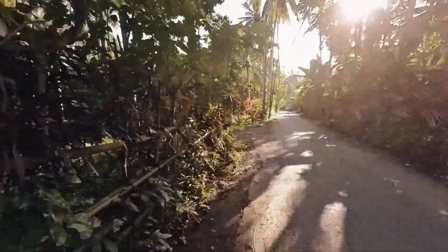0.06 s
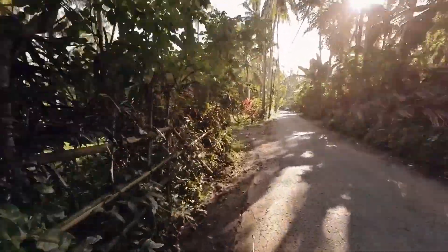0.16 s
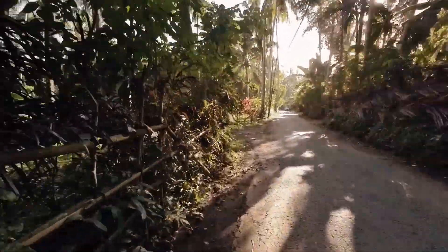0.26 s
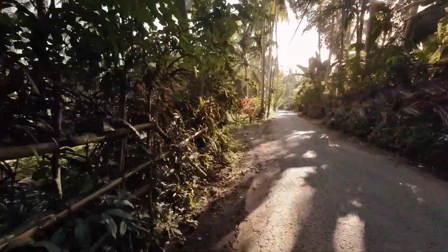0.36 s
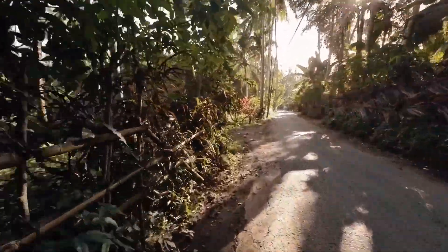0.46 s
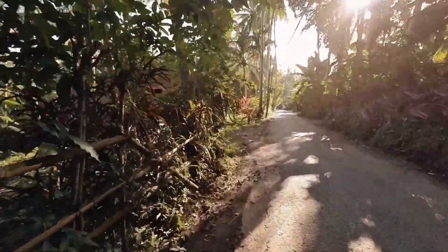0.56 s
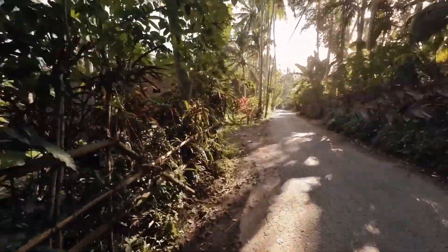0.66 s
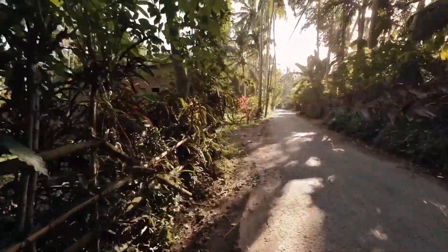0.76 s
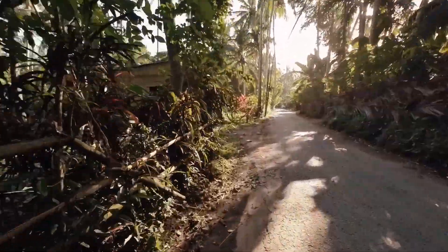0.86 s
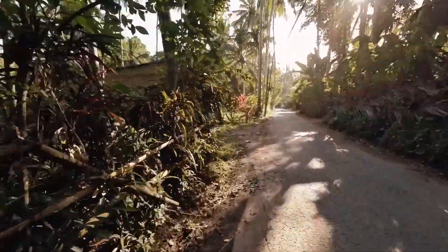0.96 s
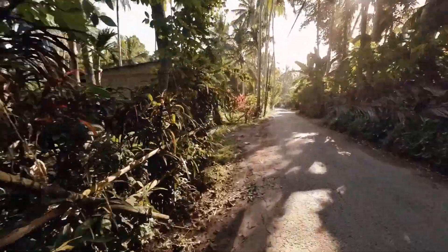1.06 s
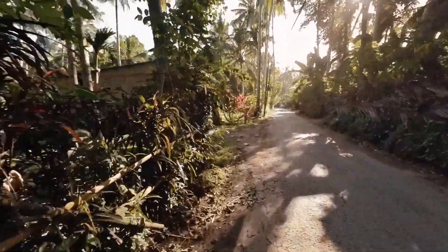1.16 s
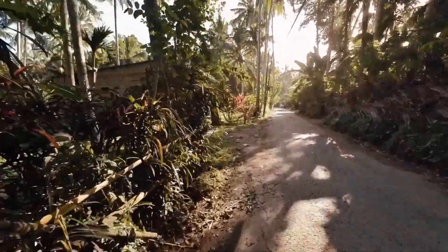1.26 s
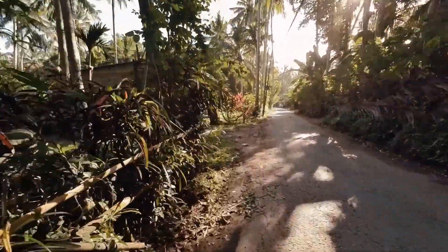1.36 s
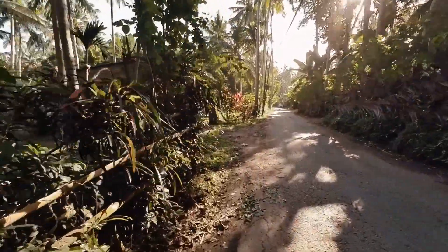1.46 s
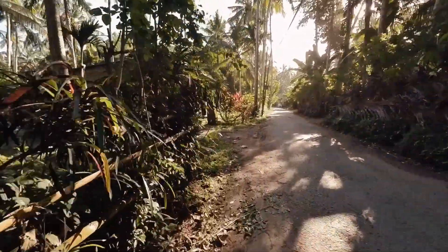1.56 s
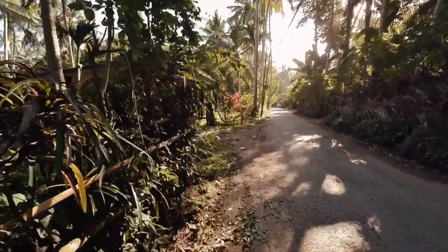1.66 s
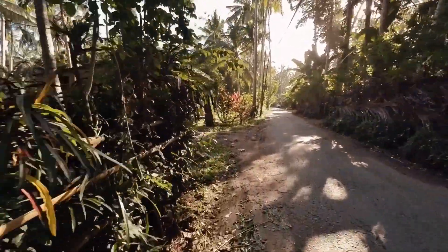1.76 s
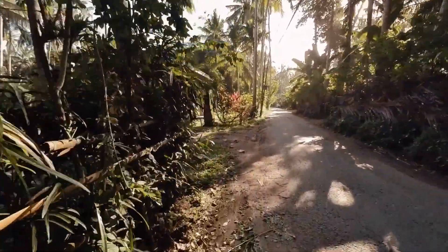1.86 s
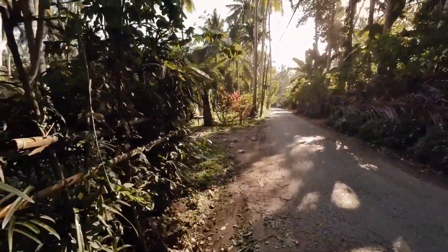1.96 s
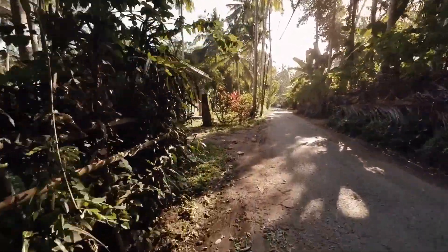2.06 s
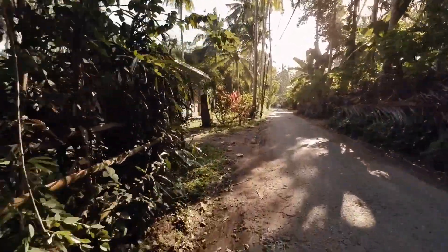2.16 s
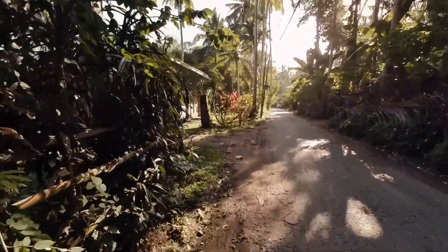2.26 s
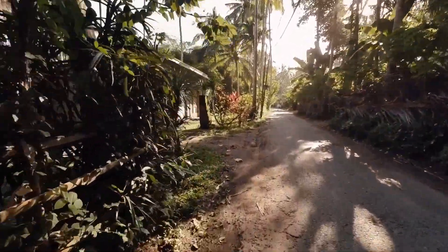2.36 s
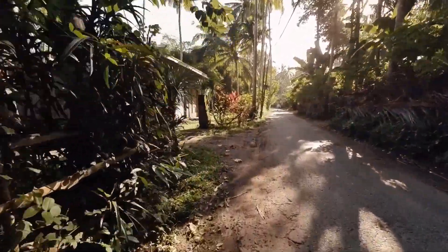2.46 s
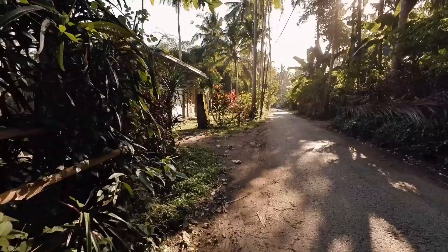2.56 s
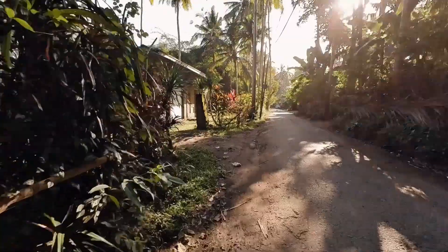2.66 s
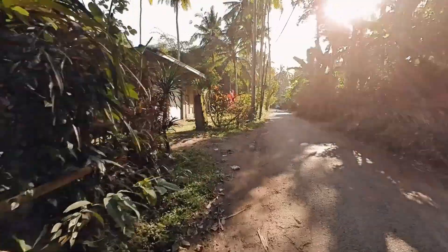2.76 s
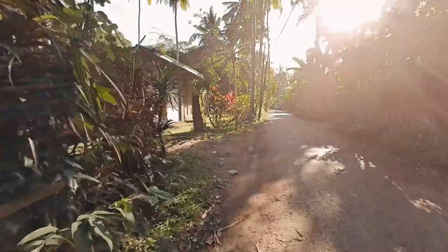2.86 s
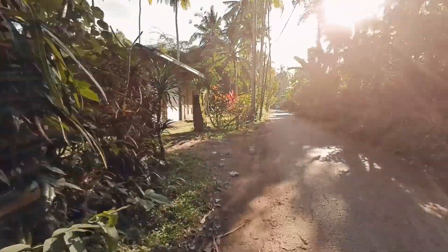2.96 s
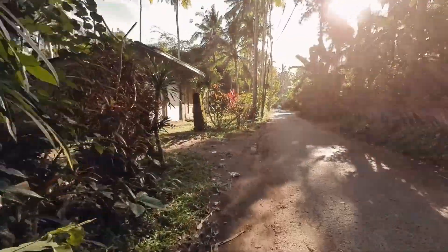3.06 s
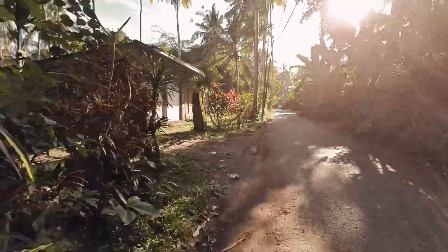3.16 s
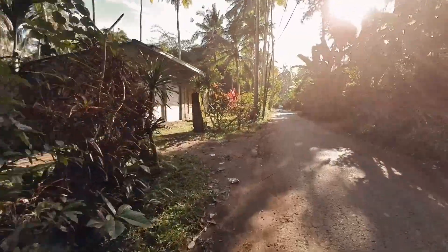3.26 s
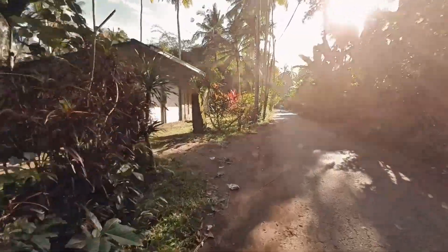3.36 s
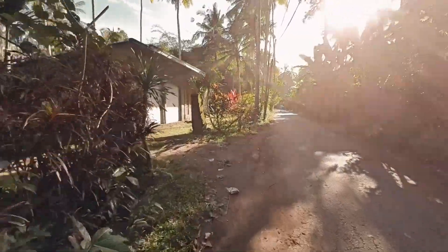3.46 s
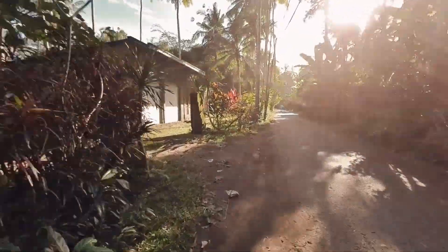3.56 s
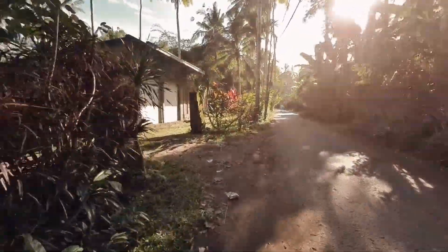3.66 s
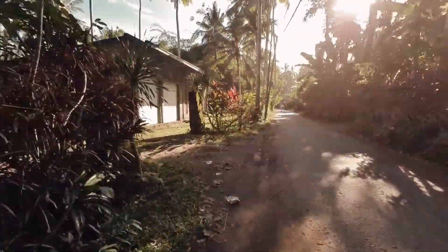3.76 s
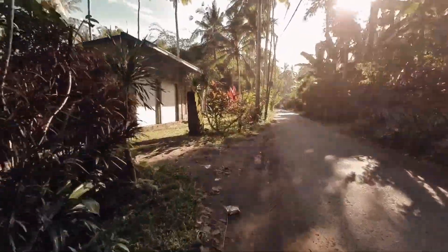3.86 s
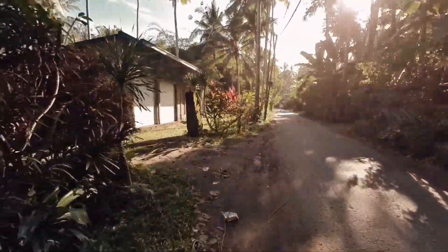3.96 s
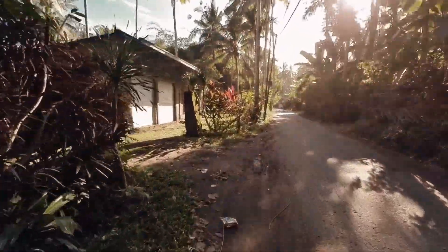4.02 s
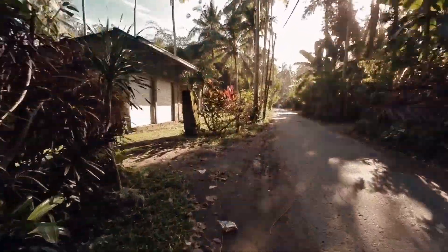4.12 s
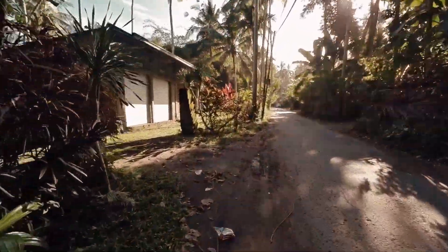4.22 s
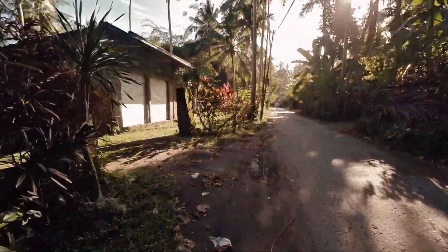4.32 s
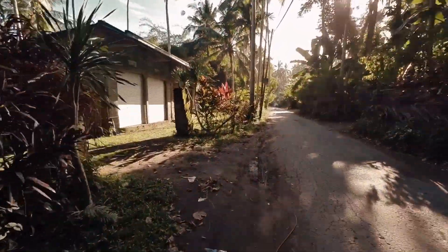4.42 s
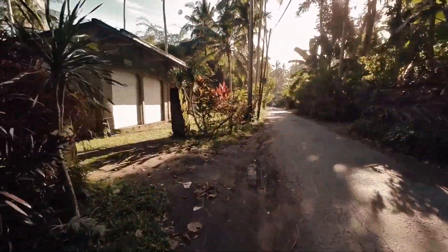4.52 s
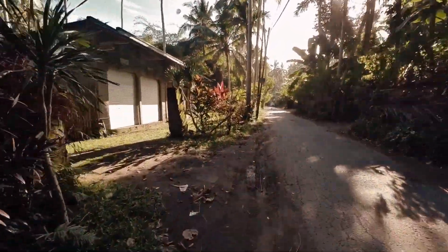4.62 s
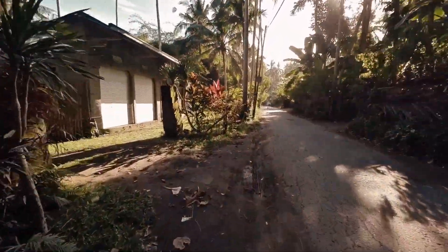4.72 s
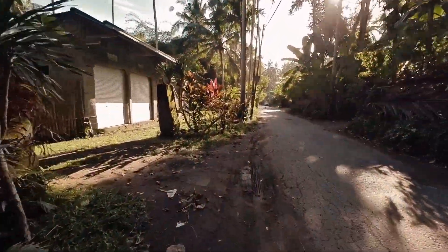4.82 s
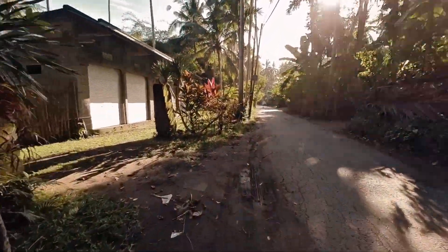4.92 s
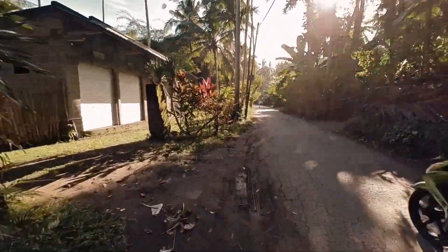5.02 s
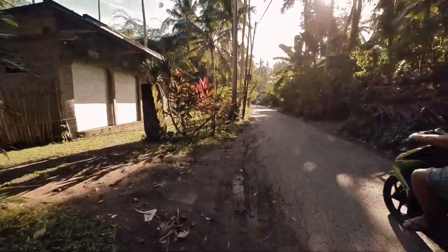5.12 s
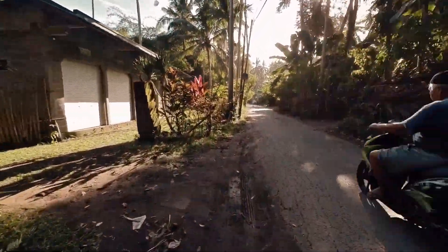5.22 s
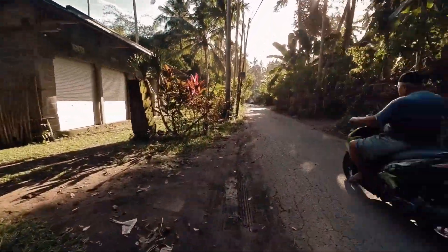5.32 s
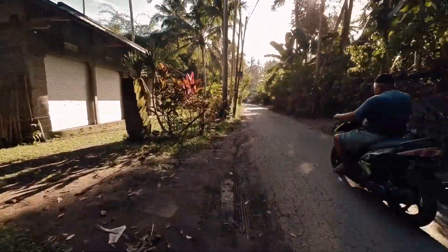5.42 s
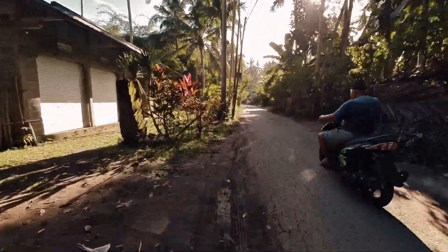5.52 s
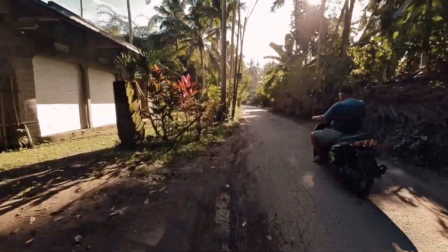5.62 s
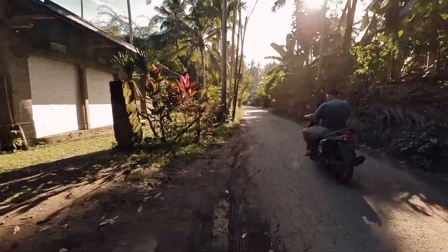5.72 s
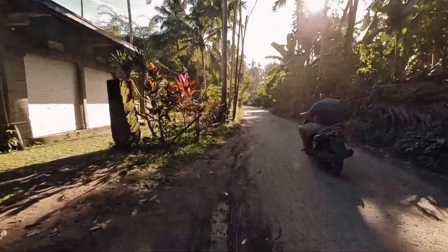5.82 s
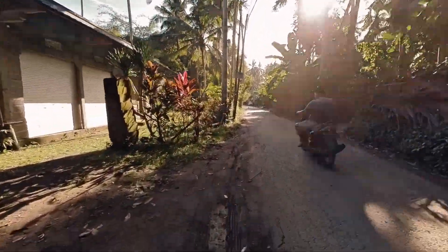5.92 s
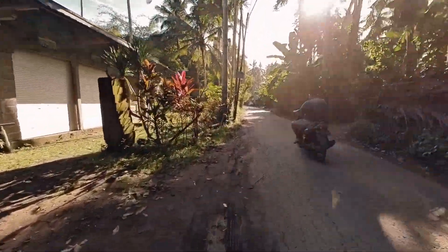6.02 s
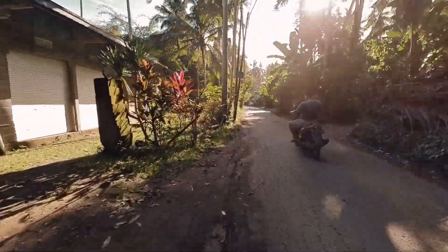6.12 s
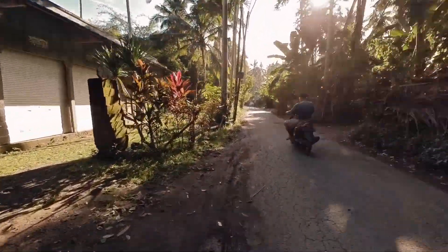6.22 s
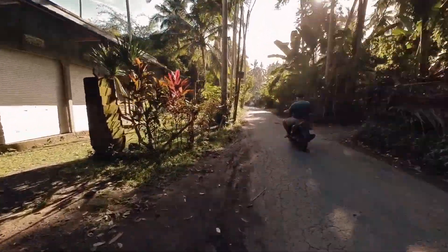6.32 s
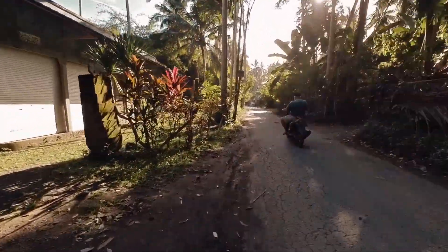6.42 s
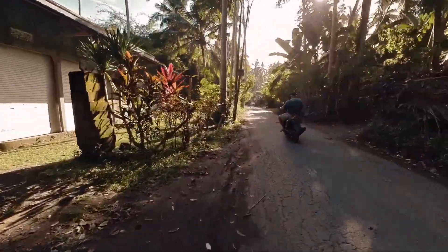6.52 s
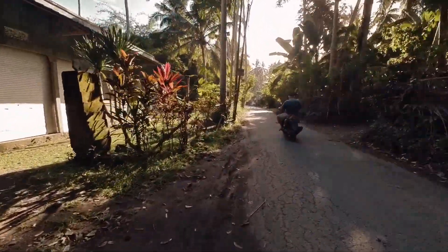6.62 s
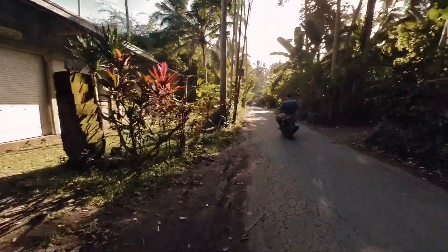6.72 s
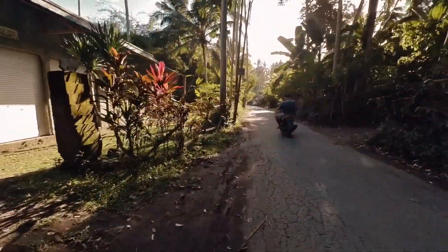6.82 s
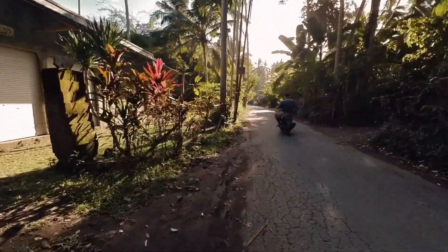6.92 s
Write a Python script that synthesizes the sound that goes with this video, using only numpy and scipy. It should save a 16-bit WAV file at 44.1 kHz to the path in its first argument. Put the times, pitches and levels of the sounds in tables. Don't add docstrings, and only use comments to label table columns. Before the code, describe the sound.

On an open-air lane, a walker carries the microphone, a faint low breeze beneath. From 0 to 3 seconds, soft heel thuds arrive about every 0.55 seconds, with small dry scuffs and ticks of grit between them, while a small single-cylinder motorbike putters faintly behind at a nearly steady low rate of about 32 pulses a second. From 3 to 4.5 seconds it swells, gaining rough casing and tyre noise and brief panel buzzes. Around 4.6 to 5 seconds it rises steeply; at about 5.2 the exhaust opens into a loud, close bark with tyre roar, valve clatter and airy hiss, and stones pop between 5 and 6 seconds. Then it recedes, with rattling tail noise and fleeting buzzes, still clearly puttering when the sound stops at 7 seconds. The body of the sound is centred, only its treble loosely wide.

```python
import sys
import numpy as np
from scipy import signal
from scipy.fft import rfft, irfft, next_fast_len
from scipy.io import wavfile
from scipy.ndimage import uniform_filter1d, map_coordinates

SR = 44100
rng = np.random.default_rng(int(sys.argv[2]) if len(sys.argv) > 2 else 0)


def store_wav(level_fs):
    pcm = np.round(np.clip(np.atleast_2d(level_fs), -1, 1) * 32767)
    wavfile.write(sys.argv[1], SR, pcm.T.astype(np.int16))


def attenuation_scalar(level_db):
    decades = np.asarray(level_db, float) / 20
    return 10 ** decades


N = 307818
TIME_S = np.arange(N) / SR

# start_s, firing_hz, throb_db at the camera, throttle_rasp_db
ENGINE = [(0, 31.25, -47, 0), (.55, 31.42, -46, -1), (.92, 31.3, -43, -1), (1.3, 31.33, -43, 1),
          (1.6, 31.5, -44.5, 1.5), (1.95, 31.85, -42.5, 1), (2.4, 32.05, -41.5, 2), (2.85, 31.96, -42.5, 3),
          (3.05, 32.07, -38, 2), (3.65, 32.17, -36.5, 3), (4.1, 32, -33.5, 1), (4.5, 31.91, -32, -1),
          (5.13, 32.14, -28.5, -2), (5.21, 32.18, -20.5, -2.5), (5.58, 31.98, -21.5, -0.5),
          (6.1, 31.78, -26, 0.5), (6.65, 31.69, -30, 0.5), (6.98, 31.7, -32, 0.5)]
# start_s, level_db
NEARNESS = [(0, -48.5), (.8, -49), (1.601, -47), (2.4, -45.5), (3.1, -42.5), (3.55, -42), (4.1, -39.5),
            (4.6, -32), (4.97, -23), (5.27, -22.5), (5.6, -26), (5.95, -29), (6.3, -32.5), (6.98, -36)]
# start_s, share (0-1)
BEHIND = [
    (0, 0.15),
    (5.25, 0),
    (5.8, 1),
    (6.98, 1),
]

# multiple of the firing rate, level_db
PIPE = [(1, -11.5), (2, -8), (3, 1.5), (4, 1.5), (5, -3.5), (6, -17), (7, -16.5), (8, -10.5), (9, -25.5),
        (10, -16), (11, -21), (12, -17)]
# re_throb_db, share of mouth gain, from_behind_db, wander_db, share of rasp
PIPE_GROUPS = [
    (-2.5, 0.16, .5, 1.2, -0.28),
    (-3, -0.78, -1, 0.8, 0.42),
    (-16.5, -0.21, 0, 3, 1),
    (-12.5, -1.76, -0.5, 2.5, 1.5),
]
# closest_db, growth with nearness, from_behind_db, side_on_db, passes_later_s
PARTS = dict(drone=(-34.5, 0.4763, 3, -1, 0), casing=(-26, 1, 2, 0, 0), cover=(-28, 1, -2, 0.5, -0.05),
         tyre=(-31, 1, -0.5, 1, -0.06), clatter=(-41, 1, 5.5, 1.5, 0.04), hiss=(-58.5, 0.85, 0.5, 6, .1),
         whistle=(-56.5, 0.9, -7.5, 4, 0.43))

# pitch_hz, density_db (per Hz)
DRONE = [(5, -2), (25, 0), (60, -3.5), (150, 0.5), (300, 2), (450, -0.5), (620, -4.5), (800, -12.5)]
# pitch_hz, width_hz, level_db
FRAME = [(388, 135, -2), (576, 73, -2.5)]
# pitch_hz, width_hz, level_db
CASING_FRONT = [(782, 148, 6), (1110, 190, 2.5)]
# pitch_hz, width_hz, level_db
CASING_TAIL = [(849, 79, 3), (1130, 83, 1)]
# pitch_hz, width_hz, level_db
COVER = [(1286, 170, 3.5), (1728, 460, -3.5)]
# pitch_hz, density_db (per Hz)
TYRE_FRONT = [(1400, -26), (1800, 0), (2200, 2), (2700, -2), (3100, -5), (3600, -10.5), (4300, -14),
              (5000, -37)]
# pitch_hz, density_db (per Hz)
TYRE_TAIL = [(1400, -29), (1900, 5.5), (2350, -0.5), (2800, 2.5), (3050, 3), (3500, 0.5), (4200, -4.5),
             (5000, -3)]
# pitch_hz, width_hz, level_db
VALVES_FRONT = [(4790, 410, 3), (6120, 760, -2), (7530, 730, -14.5)]
# pitch_hz, width_hz, level_db
VALVES_TAIL = [(4915, 270, 5), (6010, 987, -6), (7600, 770, -17.5)]
# pitch_hz, density_db (per Hz)
HISS = [(6500, -12), (8000, 8), (9200, -3), (11000, -1.5), (12000, -9), (13000, -30)]
# pitch_hz, density_db (per Hz)
WHISTLE = [(11000, -23), (12200, -7), (13300, 0), (14300, -7), (15000, -8), (15700, -20)]
# centre_s, half_length_s, pitch_hz, level_db
GLINTS = [(3.32, 0.29, 2170, -54), (3.552, 0.043, 1350, -42), (3.6, .2, 2900, -58), (4.55, 0.24, 3170, -57),
          (5.85, 0.09, 1920, -47), (0.74, 0.64, 860, -49.5), (5.15, 0.13, 450, -36.5),
          (6.24, 0.058, 3350, -44.5), (6.33, 0.2, 2970, -45.5), (6.5, .1, 7900, -68),
          (6.83, 0.17, 8300, -67), (6.8, .45, 10200, -75), (6.1, 0.12, 1470, -37.5)]

# start_s, peak_db, pitch_hz
STONES = [(1.742, -32, 731), (2.421, -34, 747), (2.798, -40, 641), (4.994, -9, 1125), (5.039, -11, 756),
          (5.117, -16, 845), (5.386, -13.5, 900), (5.197, -12.5, 940), (5.575, -9, 1096), (5.794, -17, 937),
          (5.983, -21, 1110), (6.219, -17.5, 840), (6.835, -21, 882.5)]
# start_s, thud_db, knock_re_thud_db
STEPS = [(0.184, -39, 6), (0.768, -39, 5), (1.329, -51, 9), (1.886, -35.5, 3), (2.429, -37, -8.5),
         (2.995, -38, -7), (3.578, -57, -4), (4.148, -48, 4), (4.699, -43, -7), (5.3, -66, -7),
         (5.849, -41, -9), (6.386, -29, -15), (6.929, -39, -13)]
# start_s, peak_db, low_part_re_peak_db, length_s
SCUFFS = [(0.0044, -53.5, 7, 0.039), (0.303, -57.5, 15, 0.028), (0.491, -48, 8.5, 0.047),
          (0.557, -54, 6, 0.058), (0.66, -67, 2, 0.04), (1.046, -54, 2, 0.068), (1.134, -62, -4, 0.045),
          (1.6157, -54.5, 1, 0.044), (1.731, -59, 0, 0.04), (2.172, -50.5, -8, 0.043), (2.7, -49, 7, 0.049),
          (2.741, -48, 6.5, 0.059), (3.272, -52, 5, 0.051), (3.844, -47.5, 8.5, 0.043),
          (4.617, -54, 4, 0.037)]
# start_s, peak_db, low_part_re_peak_db, length_s
TICKS = [(0.028, -62, 3, 0.0045), (0.0914, -55, 8, 0.0054), (0.1411, -59, 6, 0.005),
         (0.319, -62, 13, 0.0035), (0.495, -64, 0, 0.005), (0.586, -59, 11, 0.005),
         (1.047, -58, -2, 0.0052), (1.725, -46.5, -5, 0.005), (2.56, -66, 17, 0.0048),
         (2.693, -59, 7.5, 0.005), (2.7257, -45, -4, 0.0052), (2.77, -51, 0, 0.004),
         (3.8514, -47, 1, 0.005), (3.909, -52, 5, 0.0057), (4.167, -58, 12, 0.0046),
         (4.5113, -56, 18, 0.0046)]
# pitch_hz, density_db (per Hz)
AIR = [(5, 15), (20, 3), (60, -5), (150, 5), (300, -55)]

# pitch_hz, side_re_mid_db
WIDTH = [(2950, -90), (3150, -3.5), (4700, -6), (5800, 2), (8300, -17), (9200, 10), (11200, 0.5),
         (14500, -12)]
# pitch_hz, threshold (sigmas)
STEADINESS = [(2900, -1), (4500, 6), (5300, -1.5), (6700, -1.5), (8000, -.5), (10000, -1), (12300, 1.5),
              (14000, -4)]

# pitch_hz, density_db (per Hz)
CRACK = [(400, -30), (700, 12.0), (1500, 14.0), (3000, -12.0), (4500, -34)]
GRIT_DULL = [(1700, -30), (2300, -2), (3100, 2), (4800, -3), (7500, -10), (9000, -30)]
GRIT_BRIGHT = [(7000, 1), (8500, -5.5), (11000, -8.5), (13300, -3), (15500, -9), (16500, -30)]

CLOSEST_DB, ABREAST_S, ABREAST_WIDE_S = -23.5, 5.31, 0.28
MOUTH_S, MOUTH_OPEN_S, MOUTH_FADE_S, MOUTH_DB = 5.16, 0.012, 0.48, 6.5
SHADE_S, SHADE_WIDE_S, SHADE_DB = 5.98, 0.27, 11


def unit(x):
    return x / np.sqrt(np.mean(x ** 2) + 1e-20)


def along(points, hz):
    f, v = np.transpose(points)
    return np.interp(np.log(hz + 1), np.log(f + 1), v, left=-120, right=-120)


def curves(rows):
    s, *cols = np.transpose(rows)
    return [np.interp(TIME_S, s, c) for c in cols]


def wobble(rate):
    knots = rng.standard_normal(int(N * rate / SR) + 4)
    return map_coordinates(knots, [np.arange(N) * rate / SR])


def bump(at_s, wide_s):
    return np.exp(-((TIME_S - at_s) / wide_s) ** 2)


def filtered(x, response):
    m = next_fast_len(N + SR // 2)
    return irfft(rfft(x, m) * response(np.fft.rfftfreq(m, 1 / SR)), m)[..., :N]


def shape(points):
    return lambda f: attenuation_scalar(along(points, f))


def modes(rows):
    def response(f):
        total = 0
        for k, (centre, width, db) in enumerate(rows):
            resonator = 1j * f * width / (centre * centre - f * f + 1j * f * width)
            total = total + (-1) ** k * attenuation_scalar(db) * resonator
        return total
    return response


def rush(gate, response, patchy_db):
    z = signal.stft(rng.standard_normal(N), nperseg=512)[2]
    field = uniform_filter1d(rng.standard_normal(z.shape), 3, 0)
    field = uniform_filter1d(field, 14, 1)
    noise = signal.istft(z * attenuation_scalar(patchy_db * unit(field)), nperseg=512)[1][:N]
    return unit(filtered(gate * noise, response))


def beat(crank, count, depth_db, at, scatter_db):
    cycle = (crank * count - at + 2.5).astype(int)
    strength = 2 * np.tanh(rng.standard_normal(int(crank[-1] * count) + 9) / 2)[cycle]
    swell = np.cos(np.pi * (crank * count - at)) ** 4
    clarity = np.clip((curves(NEARNESS)[0] + 58) / 26, 0.25, 1.15)
    return attenuation_scalar(clarity * swell * (depth_db + scatter_db * strength))


def level(part):
    top_db, growth, tail_db, side_db, later_s = PARTS[part]
    near_db = np.interp(TIME_S - later_s, *np.transpose(NEARNESS))
    distance_db = top_db + growth * (near_db - CLOSEST_DB)
    facing_db = tail_db * curves(BEHIND)[0] + side_db * bump(ABREAST_S, ABREAST_WIDE_S)
    return distance_db + facing_db + 0.8 * wobble(5)


def turning(front, tail):
    angle = np.pi / 2 * np.clip(curves(BEHIND)[0], 0, 1)
    return np.cos(angle) * front + np.sin(angle) * tail


def exhaust(crank):
    _, throb_db, rasp_db = curves(ENGINE)
    since = TIME_S - MOUTH_S
    opening = 0.5 + 0.5 * np.tanh(since / MOUTH_OPEN_S)
    mouth_db = MOUTH_DB * opening * np.exp(-(np.maximum(since, 0) / MOUTH_FADE_S) ** 2)
    far = np.clip((-30 - throb_db) / 12, 0.25, 1)
    leaders_db = []
    for db, mouth_share, tail_db, wander_db, rasp_share in PIPE_GROUPS:
        leader_db = throb_db + db + mouth_share * mouth_db + tail_db * curves(BEHIND)[0]
        leaders_db.append(leader_db + wander_db * far * wobble(4) + rasp_share * rasp_db)
    pipe_db = dict(PIPE)
    out = np.zeros(N)
    for k, db in PIPE:
        group = int(np.searchsorted([3.5, 5.5, 7.5], k))
        leading_multiple = (3, 4, 6, 8)[group]
        level_db = leaders_db[group] + db - pipe_db[leading_multiple]
        lead = 0.45 * (k - 3) - 2.35 * (k > 3.5) + 1.4 * max(k - 4.8, 0)
        unsteady_db = min(0.3 + 0.4 * abs(k - 3.5), 2.5) * wobble(6)
        drift = 0.004 * k * k * wobble(14) + 0.02 * k * wobble(9)
        out += np.sqrt(2) * attenuation_scalar(level_db + unsteady_db) * np.cos(2 * np.pi * k * crank + lead + drift)
    return out


def roar(crank):
    drone_db, casing_db, cover_db, tyre_db = [level(part) for part in ("drone", "casing", "cover", "tyre")]
    low_gate = beat(crank, count=2, depth_db=2.5, at=0.38, scatter_db=1.5)
    mid_gate = beat(crank, count=2, depth_db=3.4, at=0.44, scatter_db=1.9)
    top_gate = beat(crank, count=2, depth_db=2.4, at=0.45, scatter_db=2.8)

    drone = rush(low_gate, shape(DRONE), patchy_db=0.5)
    frame_gain = np.clip(attenuation_scalar(1.56 * (casing_db + 26)), 0, 1.6)
    drone += frame_gain * rush(low_gate, modes(FRAME), patchy_db=-4.0)
    casing_front = rush(mid_gate, modes(CASING_FRONT), patchy_db=0.5)
    casing_tail = rush(mid_gate, modes(CASING_TAIL), patchy_db=1.5)
    cover = rush(mid_gate, modes(COVER), patchy_db=1.5)
    tyre_front = rush(top_gate, shape(TYRE_FRONT), patchy_db=1.6)
    tyre_tail = rush(top_gate, shape(TYRE_TAIL), patchy_db=2.2)

    out = attenuation_scalar(drone_db + 1.0 + 0.74 * curves(ENGINE)[2]) * drone
    out += attenuation_scalar(casing_db - 0.45) * turning(casing_front, casing_tail)
    out += attenuation_scalar(cover_db - 1.0) * cover
    return out + attenuation_scalar(tyre_db - 1.46) * turning(tyre_front, tyre_tail)


def gear(crank):
    clatter_db, hiss_db, whistle_db = [level(part) for part in ("clatter", "hiss", "whistle")]

    def steep(rows):
        return lambda f: modes(rows)(f) * (f / 4600) ** 6 / (1 + (f / 4600) ** 6)

    tap = beat(crank, count=1, depth_db=3.8, at=0.5, scatter_db=1.8)
    front = rush(tap, steep(VALVES_FRONT), patchy_db=2.4)
    tail = rush(tap, steep(VALVES_TAIL), patchy_db=2.2)
    shake = beat(crank, count=2, depth_db=1.5, at=0.4, scatter_db=1.2)
    hiss = rush(shake, shape(HISS), patchy_db=1.8)
    whistle = rush(shake, shape(WHISTLE), patchy_db=1.2)
    shade = attenuation_scalar(-SHADE_DB * bump(SHADE_S, SHADE_WIDE_S))
    air = attenuation_scalar(hiss_db - 1.0) * hiss + attenuation_scalar(whistle_db) * whistle
    return attenuation_scalar(clatter_db - 0.87) * turning(front, tail) + shade * air


def glints(crank):
    shake = beat(crank, count=1, depth_db=7, at=0.17, scatter_db=2)
    out = np.zeros(N)
    for s, half_s, hz, db in GLINTS:
        panel = modes([(hz, 320, 0)])
        out += attenuation_scalar(db) * bump(s, half_s) * rush(shake, lambda f: panel(f) ** 2, patchy_db=2)
    return out


def stones():
    out, t = np.zeros(N + SR), np.arange(SR // 40) / SR
    crack = filtered(rng.standard_normal(N), shape(CRACK))
    onset = np.tanh((t / 0.00081) ** 2)
    for s, db, hz in STONES:
        start = round(s * SR)
        ring = attenuation_scalar(0.5 - 60 * t / 0.028) * np.sin(2 * np.pi * hz * t)
        snap = attenuation_scalar(-15 - 60 * t / 0.052) * unit(crack[start:][:len(t)])
        out[start:][:len(t)] += attenuation_scalar(db) * onset * (ring + snap)
    return out[:N]


def steps():
    out, t = np.zeros(N + SR), np.arange(SR // 5) / SR
    thud = np.sin(2 * np.pi * 16 * t) * np.tanh(t / 0.0047) * np.exp(-t / 0.034)
    knock = -np.sin(2 * np.pi * 130 * t) * np.tanh(t / 0.00072) * np.exp(-t / 0.016)
    for s, db, knock_db in STEPS:
        out[round(s * SR):][:len(t)] += attenuation_scalar(db + 6.5) * (thud + attenuation_scalar(knock_db - 4) * knock)
    return out[:N]


def scuffs():
    low, high, t = np.zeros(N + SR), np.zeros(N + SR), np.arange(SR // 5) / SR
    for s, db, low_db, length in SCUFFS + TICKS:
        if length < 0.012:
            db, low_db = db + 3, low_db + 6
        fade = (1 - np.exp(-t / (0.068 * length))) * np.exp(-(t / length) ** 2)
        start = round(s * SR)
        low[start:][:len(t)] += attenuation_scalar(db + low_db - 11) * fade
        high[start:][:len(t)] += attenuation_scalar(db - 12.0) * fade
    grit = attenuation_scalar(3 * wobble(400))
    dull = rush(grit, shape(GRIT_DULL), patchy_db=1.2)
    bright = rush(grit, shape(GRIT_BRIGHT), patchy_db=-3.5)
    return low[:N] * dull + high[:N] * bright


def breeze():
    return attenuation_scalar(-48.0) * rush(attenuation_scalar(3.2 * wobble(5.2)), shape(AIR), patchy_db=-1.0)


def scene():
    crank = np.cumsum(curves(ENGINE)[0]) / SR
    bike = exhaust(crank) + roar(crank) + gear(crank) + glints(crank) + stones()
    mono = bike + steps() + scuffs() + breeze()
    return np.array([mono, mono])


def low_pass(x):
    return signal.sosfilt(signal.butter(12, 15730, fs=SR, output="sos"), x)


def record(dry):
    hz, _, z = signal.stft(dry[0], SR, nperseg=2048)
    envelope = np.sqrt(np.abs(uniform_filter1d(np.abs(z) ** 2, 17, 0)))
    noise = signal.stft(rng.standard_normal(N), SR, nperseg=2048)[2]
    band = np.arange(len(hz)) // 32
    luck = unit(uniform_filter1d(rng.standard_normal((33, z.shape[1])), 3, 1))[band]
    alive = luck < along(STEADINESS, (band + 0.5) * 32 * hz[1])[:, None]
    spread = noise / np.std(noise) * envelope * alive * attenuation_scalar(along(WIDTH, hz))[:, None]
    side = signal.istft(spread, SR, nperseg=2048)[1][:N]
    rim = filtered(dry, lambda f: f > 15100)
    dry = dry - rim * np.clip(2 * wobble(12) - 0.6, 0, 1)
    ending = np.clip(TIME_S[::-1] / 0.0008, 0, 1)
    mix = filtered(ending * (dry + [side, -side]), lambda f: f < 15725)
    return low_pass(mix)


dry = scene()
out = record(dry)
store_wav(out)
```